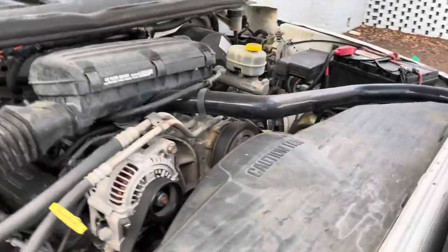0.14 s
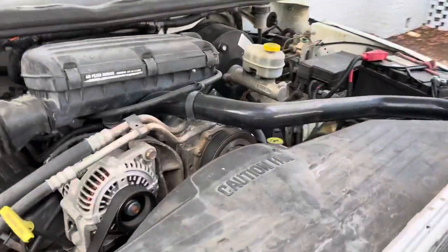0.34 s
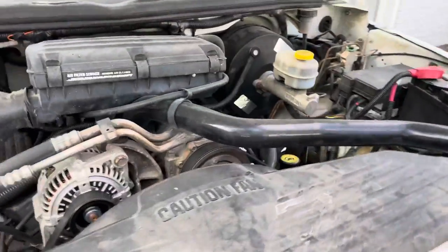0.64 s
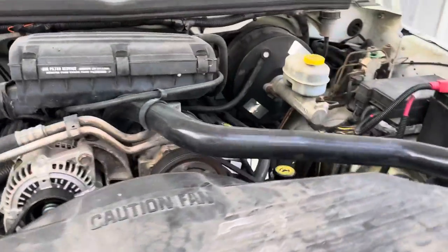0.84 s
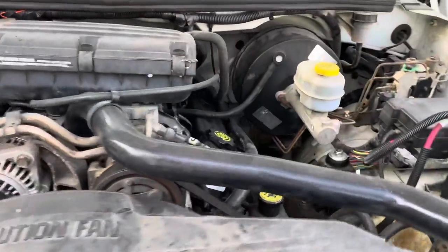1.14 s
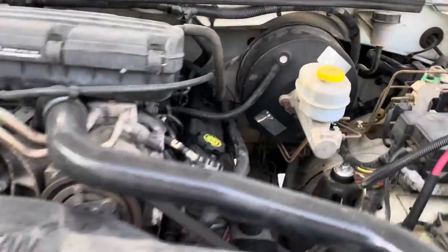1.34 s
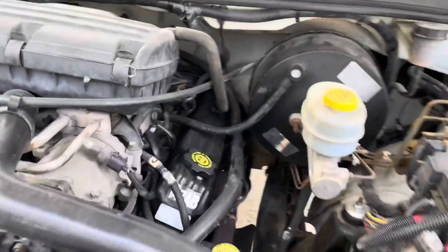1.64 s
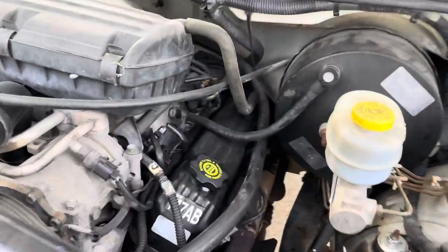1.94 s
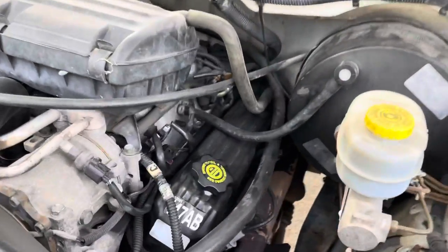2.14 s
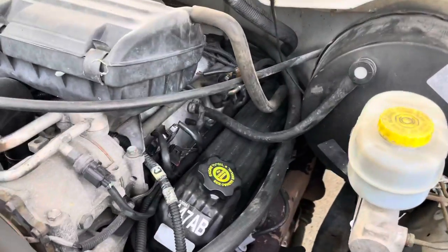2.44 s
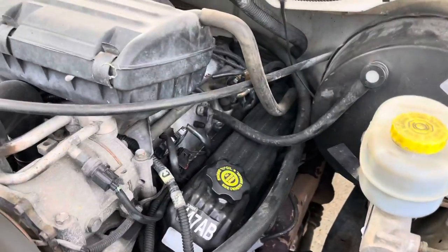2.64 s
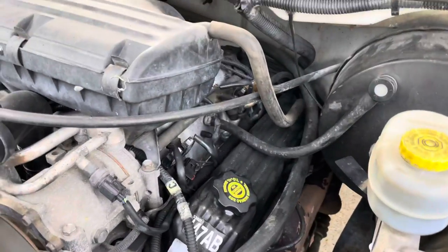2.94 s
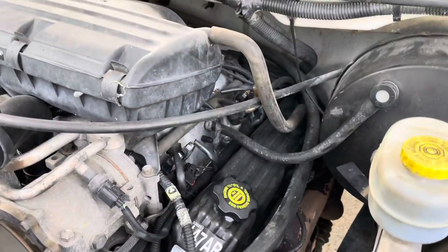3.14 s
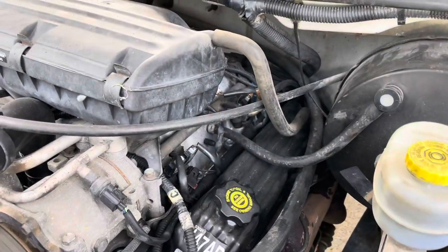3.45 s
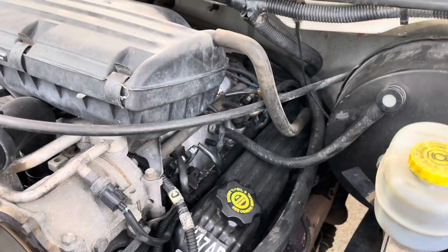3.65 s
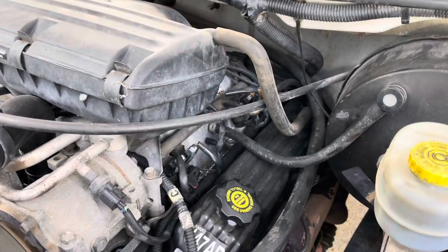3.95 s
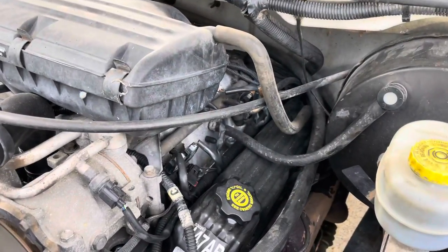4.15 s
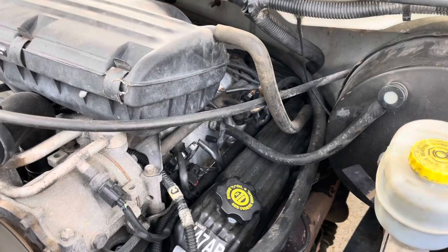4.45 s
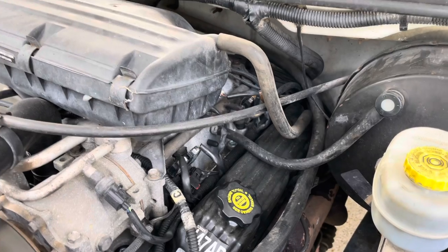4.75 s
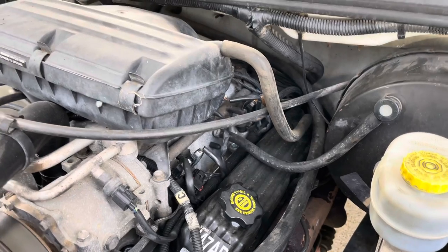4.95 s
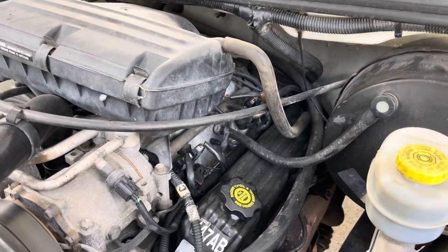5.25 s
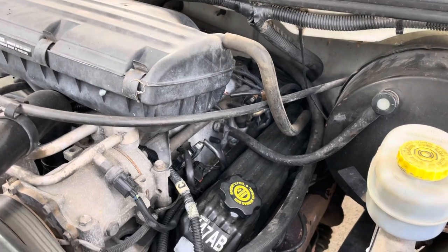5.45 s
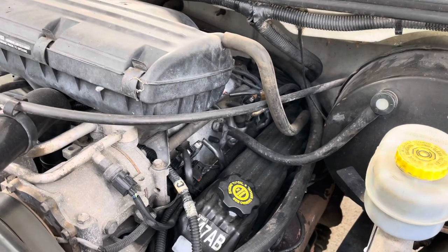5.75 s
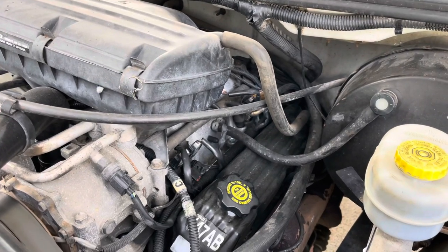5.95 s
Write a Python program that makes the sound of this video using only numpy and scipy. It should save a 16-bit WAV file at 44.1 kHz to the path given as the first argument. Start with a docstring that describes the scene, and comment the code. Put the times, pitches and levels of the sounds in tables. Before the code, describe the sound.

Outdoors, a stereo microphone moves in over the open bay of a large eight-cylinder petrol engine, already running. At 0 s it is at fast idle, a dense, quick throb with strong airy fan-shroud roar, belt rush and rattling metal, and two loose knocks near 0.1 s. Speed falls steadily, the throb dipping unevenly, and by about 2.2 s it settles into a slow, lumpy, limping idle. The roar fades by 2 s as the microphone leans closer; a slack lifter clacks most clearly from 2.1 to 3 s, and sharp spitting hiss comes forward. From 2.7 to 5.2 s a low fan hum swells, strongest near 3.7 s. A thin alternator whine wavers in and out, firmer after 4 s. Around 4.5 to 5 s the speed hunts slightly. Hollow intake honk, clatter, ticks and a faint panel drone grow until the cut at 6.1 s, still idling.

```python
"""A cross-plane V8 sinks from a fast idle to a lumpy 670 rpm, heard from above its open engine bay.
Uneven exhaust pulses throb through pipe resonances; intake gulps ring the air box into a honk.
Thumps at each cylinder's crank angle ring the block; ticks, rocker taps and a slack lifter join in.
Filtered noise makes hiss, shroud roar and belt rush, nearer as the microphone leans in.
Wavering sines make the fan hum, the alternator and pulley whines and a panel's drone."""
import sys
import numpy as np
from scipy import signal
from scipy.fft import rfft, irfft, next_fast_len
from scipy.io import wavfile
from scipy.ndimage import uniform_filter1d, map_coordinates

SR = 44100
rng = np.random.default_rng(int(sys.argv[2]) if len(sys.argv) > 2 else 0)


def generate_wav(sig):
    """Save sig (samples, or channels by samples) to the path in sys.argv[1] as 16-bit PCM at SR."""
    pcm = np.round(np.clip(np.atleast_2d(sig).T, -1, 1) * 32767).astype(np.int16)
    wavfile.write(sys.argv[1], SR, pcm)


N = 268569
TIME_S = np.arange(N) / SR

# Cylinders in firing order. Each row: exhaust lag in firing intervals, exhaust level in dB,
# intake lag in firing intervals, intake level in dB, hiss puff level in dB,
# thump lag in firing intervals, thump level in dB.
CYLINDERS = [ (0.284, 5, 0.732, -2, 13, 0.212, -6.5), (-0.187, 5.5, 0.5094, 4, 3, 0.2276, -7.5),
             (0.62, 0, 0.726, 5, 14, 0.07, -8), (0.26, 4.5, 0.596, 2, 14, 0.413, -3),
             (-0.188, 4.1, 0.627, 3.5, -2, 0.479, -8.5), (0.276, 3.1, 0.228, 2, 10, 0.1063, -4),
             (0.315, -1.5, 0.17, -2, -3, 0.2675, -8.5), (0.656, 4, 0.205, 2.5, 10, 0.3246, -5.5)]
CYLINDER_COUNT = len(CYLINDERS)

# Nearness of the parts as the microphone moves in. Each row: time in seconds, intake level in dB,
# block level in dB, belts level in dB, valve sizzle level in dB, hiss level in dB.
BAY_LEVELS = [(0, -38.5, -38.5, -38, -40.5, -54), (.55, -41.5, -42.5, -42.5, -45.5, -56),
              (1.2, -38.5, -41, -43, -47.5, -51.5), (1.55, -34.5, -39.5, -41, -44, -52.5),
              (2.35, -35, -36.5, -40, -42.5, -43), (4.2, -32, -35.5, -38.5, -42.5, -41.5),
              (5.4, -29, -35.5, -36.5, -41, -40), (6.09, -29, -32.5, -35.5, -40, -40)]

# Fan shroud roar, fading as the microphone moves over the engine. Each row: time in seconds, level in dB.
ROAR_LEVEL = [(0, -31.5), (.3, -36), (.6, -36.5), (1.0, -39.5), (1.4, -39), (2.0, -57), (6.09, -70)]


def undb(db):
    """Decibels to gain."""
    return 10 ** (np.asarray(db) / 20)


def unit(x):
    """Scale to rms 1."""
    return x / np.sqrt(np.mean(x ** 2))


def curves(table):
    """Columns of a breakpoint table, interpolated linearly over time."""
    time_s, *columns = np.transpose(table)
    return [np.interp(TIME_S, time_s, column) for column in columns]


def colour(x, points, share=1):
    """Zero-phase filter by (Hz, dB) points joined on a log-frequency axis; share scales the dB."""
    hz, db = np.transpose(points)
    size = next_fast_len(N + SR // 10)
    bins_hz = np.maximum(np.fft.rfftfreq(size, 1 / SR), 1)
    gain = undb(share * np.interp(np.log(bins_hz), np.log(hz), db))
    return irfft(rfft(x, size) * gain, size)[:N]


def noise(points):
    """Coloured noise of rms 1."""
    return unit(colour(rng.standard_normal(N), points))


def walk(rate_hz):
    """Smooth random control of rms 1: held random steps, averaged twice."""
    k = int(SR / rate_hz)
    steps = np.repeat(rng.standard_normal(N // k + 1), k)
    return unit(uniform_filter1d(uniform_filter1d(steps, k), k)[:N])


def ring(x, modes):
    """Sum of damped resonances, each given as (Hz, width in Hz, dB)."""
    return sum(undb(db) * signal.lfilter(*signal.iirpeak(hz, hz / width_hz, fs=SR), x)
               for hz, width_hz, db in modes)


def band(x, low_hz, high_hz, order):
    """Butterworth band-pass."""
    return signal.sosfilt(signal.butter(order, [low_hz, high_hz], "band", fs=SR, output="sos"), x)


def strokes(crank, lags, sizes_db, scatter_db, jitter):
    """One pulse per cylinder and cycle, scattered in size and time; crank, lags, jitter in firing intervals."""
    k = np.arange(int(crank[-1]))
    cylinder = k % CYLINDER_COUNT
    chance = rng.standard_normal((N // 100, 2))[:len(k)]
    lag = (lags + np.zeros(CYLINDER_COUNT))[cylinder]
    at = np.interp(k + lag + jitter * chance[:, 0], crank, np.arange(N))
    size = undb(sizes_db[cylinder] + scatter_db * chance[:, 1])
    # share each pulse between the two nearest samples
    whole, part = at.astype(int), at % 1
    early = np.bincount(whole, size * (1 - part), N + 1)
    late = np.bincount(whole + 1, size * part, N + 1)
    return (early + late)[:N]


def puffs(pulses, length_s):
    """Turn each pulse into a Gaussian envelope that falls to 1/e at length_s either side."""
    offset_s = np.arange(-(SR // 50), SR // 50 + 1) / SR
    return unit(signal.fftconvolve(pulses, np.exp(-(offset_s / length_s) ** 2), "same"))


def impacts(crank, count):
    """Small parts tap at the same crank angles cycle after cycle."""
    angle = rng.random(count) * CYLINDER_COUNT
    size = rng.choice([-1., 1.], count)
    when = (np.arange(0, crank[-1], CYLINDER_COUNT)[:, None] + angle).ravel()
    at = np.interp(when, crank, np.arange(N)).astype(int)
    return np.bincount(at, np.resize(size, len(at)) * (when < crank[-1]), N)


def exhaust(crank, lags, sizes_db):
    """The cylinders' pulses reach the pipe with different delays, so the beat limps."""
    # Each row: frequency in Hz, width in Hz, level in dB.
    pipe_modes = [(57.7, 11, 8), (68.2, 11.2, 14), (105.8, 19, 17.5)]
    pulses = strokes(crank, lags, sizes_db, scatter_db=1.76, jitter=0.017)
    return unit(band(ring(pulses, pipe_modes), 41.7, 115.5, order=4))


def lope_dips():
    """Exhaust gain: brief Gaussian dips in the limping throb, and one brief lift."""
    # Each row: centre in seconds, change in dB.
    dip_times = [(.45, -14), (.62, -7), (.76, -7), (.93, -14), (1.63, -17), (2.35, -1), (4.985, 4)]
    width_s = 0.026
    return undb(sum(db * np.exp(-((TIME_S - s) / width_s) ** 2) for s, db in dip_times))


def shake(crank, firing_hz):
    """The block rocks once per firing: a bass sine, louder with engine speed."""
    idle_hz, idle_db, rise_db_per_octave = 45, -39.5, 11
    db = idle_db + rise_db_per_octave * np.log2(firing_hz / idle_hz)
    return undb(db) * unit(np.cos(2 * np.pi * crank))


def intake(crank, lags, sizes_db):
    """Unequal gulps of air ring the air box, so the honk swells with the engine cycle."""
    # Each row: frequency in Hz, width in Hz, level in dB.
    airbox_modes = [(263.4, 17, 4), (309.5, 19.6, -3)]
    gulps = strokes(crank, lags, sizes_db, scatter_db=0.2, jitter=0.012)
    return unit(band(ring(gulps, airbox_modes), 214, 324, order=3))


def clatter(crank, lags, sizes_db):
    """Each cylinder thumps the block at its own crank angle and rings its modes; loose parts rattle along."""
    # Each row: frequency in Hz, width in Hz, level in dB.
    block_modes = [(326, 16, -2.5), (421.3, 21, 4.5), (453, 55, 1.5), (559, 13.2, 7.5), (640, 13, -11),
                   (689, 15, -2.5), (820, 21, -13), (980, 370, -9.5)]
    rattle_db = -2  # relative to the thumps
    blows = strokes(crank, lags, sizes_db, scatter_db=0.5, jitter=0.0073)
    grain = unit(impacts(crank, count=160)) + undb(-4.5) * rng.standard_normal(N)
    rattle = grain * (puffs(blows, length_s=0.0039) + 1.4)
    force = unit(blows) + undb(rattle_db) * unit(rattle)
    return unit(band(ring(force, block_modes), 300, 960, order=2))


def wash():
    """Rush of air around the block: coloured noise with an uneven level."""
    # Each row: frequency in Hz, level in dB.
    wash_spectrum = [(30, -24), (55, -25), (110, -15), (160, 0.5), (300, -1), (365, -1), (450, 0),
                     (525, -5), (565, -2.5), (610, -8), (700, -7), (770, -20), (1400, -22.5), (3000, -79)]
    return noise(wash_spectrum) * undb(0.76 * walk(16))


def lifter(crank):
    """One slack lifter clacks once per cycle: decaying noise bursts."""
    # Each row: frequency in Hz, level in dB.
    clack_spectrum = [(700, -11), (1400, 3.5), (1900, 7), (2600, -1), (4000, -12), (6500, -3), (12000, -30)]
    angle_firings, decay_s = 5.7, 0.015
    since_firings = (crank - angle_firings) % CYLINDER_COUNT
    since_s = since_firings / np.gradient(crank) / SR
    return unit(colour(rng.standard_normal(N) * np.exp(-since_s / decay_s), clack_spectrum))


def knocks():
    """Now and then the shaking engine knocks a loose part: decaying noise bursts."""
    # Each row: start in seconds, level in dB.
    knock_times = [(.1, -33), (.165, -31), (.884, -32), (.987, -35), (1.605, -35), (2.035, -35),
                   (2.995, -33), (4.225, -34), (4.628, -35), (5.471, -38), (5.717, -35)]
    # Each row: frequency in Hz, level in dB.
    knock_spectrum = [(400, -20), (750, 15), (1100, 4), (1700, -2), (2300, -13), (3400, -13), (6000, -22),
                      (8500, -55)]
    decay_s = 0.016
    force = sum(undb(db) * (TIME_S >= s) * np.exp(-np.abs(TIME_S - s) / decay_s) for s, db in knock_times)
    return force * noise(knock_spectrum)


def rockers(crank):
    """The rocker arms tap the valve cover, which rings briefly."""
    # Each row: frequency in Hz, width in Hz, level in dB.
    cover_modes = [(1726, 110, 1.5), (2070, 130, -2)]
    taps = sum(strokes(crank, lag, np.zeros(CYLINDER_COUNT), scatter_db=1.5, jitter=0.0296)
               for lag in (0.15, 0.45, 0.8))
    return unit(band(ring(taps, cover_modes), 1420, 2600, order=2))


def sizzle(crank):
    """Light tappet ticks gate noise over the steady rush of the accessories."""
    # Each row: frequency in Hz, level in dB.
    sizzle_spectrum = [(1200, -57), (2500, 4), (3300, 4.5), (4000, 1.5), (4500, 4), (5800, -0.5),
                       (7000, 1.5), (8500, -6), (10000, -1.5), (12000, -2.5), (13500, -4.5), (15700, -10.5)]
    pulses = strokes(crank, 0.67, np.zeros(CYLINDER_COUNT), scatter_db=1.5, jitter=0.11)
    ticks = puffs(pulses, length_s=0.0025)
    return unit(noise(sizzle_spectrum) + undb(-9.5) * ticks * noise(sizzle_spectrum))


def hiss(crank, sizes_db):
    """Gas spits from the near manifold in puffs at the firings, over a steady leak."""
    # Each row: frequency in Hz, level in dB.
    hiss_spectrum = [(4000, -15), (6000, -4.5), (7000, -2.5), (8000, 2.5), (9300, 6), (11000, 2.5),
                     (12300, 2), (12750, 7), (13150, 1), (14200, 0.5), (15700, -11.5)]
    gate = puffs(strokes(crank, 0.35, sizes_db, scatter_db=1.3, jitter=0.02), length_s=0.0067)
    return unit(noise(hiss_spectrum) + undb(-2) * gate * noise(hiss_spectrum))


def alternator(crank, firing_hz):
    """Belt-driven whine: a sine bent once per cycle by the crank's speed and at random, uneven in level."""
    whine_per_firing = 23.15
    flutter = 0.004 * np.sin(2 * np.pi * crank / CYLINDER_COUNT) + 0.005 * walk(70)
    phase = 2 * np.pi * np.cumsum(whine_per_firing * firing_hz * (1 + flutter)) / SR
    return unit(np.sin(phase) * undb(1.0 * walk(16) + 2.6 * walk(90)))


def fan():
    """Blade-passing hum of a fan slipping on its clutch; the overtone is heard close to the shroud."""
    # Each row: time in seconds, blade rate in Hz, level in dB.
    blade_track = [(0.0, 100.56, -37.5), (0.5, 102.94, -39.4), (1.2, 102.76, -40.6), (1.5, 106.77, -36.9),
                   (2.1, 103.64, -41.8), (2.5, 102.54, -36.5), (2.75, 103.57, -27.8), (3.1, 104.58, -28.7),
                   (3.35, 105.84, -28.8), (3.7, 103.97, -21.2), (4.2, 103.15, -24.8), (4.7, 101.27, -22.5),
                   (5.1, 100.31, -28.3), (5.6, 100.14, -34.1), (6.09, 99.27, -32.5)]
    overtone_db = -13.5  # second harmonic, relative to the shroud's roar
    blade_hz, hum_db = curves(blade_track)
    phase = 2 * np.pi * np.cumsum(blade_hz) / SR
    hum = undb(hum_db) * unit(np.sin(phase))
    overtone = undb(curves(ROAR_LEVEL)[0] + overtone_db) * unit(np.sin(2 * phase))
    return hum + overtone


def belts(crank):
    """Belts chatter: a grain repeating every cycle inside an uneven rush."""
    # Each row: frequency in Hz, level in dB.
    belt_spectrum = [(300, -14.5), (650, 0), (1050, 3.5), (1300, -3.5), (1580, -2.5), (1760, -1),
                     (1920, -3.5), (2150, -3), (2700, -11.5), (4000, -27), (8000, -63)]
    grain = unit(colour(impacts(crank, count=320), belt_spectrum))
    return unit((noise(belt_spectrum) + grain) * undb(1.0 * walk(70)))


def pulley(firing_hz):
    """An idler pulley sings faintly just below the alternator, wavering as the belt flaps."""
    whine_per_firing, level_db = 20.9, -15  # level relative to the belts
    phase = 2 * np.pi * np.cumsum(whine_per_firing * firing_hz * (1 + 0.00415 * walk(30))) / SR
    return undb(level_db) * unit(np.sin(phase) * undb(2 * walk(29.97)))


def drone():
    """A panel, shaken by the block, holds a nearly steady note of uneven level."""
    panel_hz = 561
    phase = 2 * np.pi * np.cumsum(panel_hz * (1 + 0.011 * walk(35))) / SR
    return unit(np.sin(phase) * undb(4.2 * walk(30)))


def roar(crank):
    """The shroud roars; its reflection off the fan cover comes ever later, so the colour sweeps down."""
    # Each row: frequency in Hz, width in Hz, level in dB.
    shroud_modes = [(339.4, 28, 9), (613, 113, -0.5), (748, 43, -8), (960, 190, -8.5), (1340, 220, -15),
                    (3260, 600, -15)]
    extra_path_m, path_growth_m_per_s, reflection_db = 0.51, 0.67, -16.5
    force = unit(impacts(crank, count=90)) + undb(-4) * rng.standard_normal(N)
    direct = band(ring(force, shroud_modes), 175, 3200, order=2)
    delay_s = (extra_path_m + path_growth_m_per_s * TIME_S) / 343  # speed of sound in m/s
    reflection = map_coordinates(direct, [(TIME_S - delay_s) * SR], order=1)
    return unit((direct + undb(reflection_db) * reflection) * undb(2.8 * walk(45.1)))


def machinery(crank, firing_hz):
    """Sum of everything that rushes, ticks and whines under the bonnet."""
    # Lifter, loudest as the microphone passes the valve cover. Each row: time in seconds, level in dB.
    lifter_level = [(0, -62), (1.7, -58), (2.15, -49), (2.5, -49), (2.75, -47), (3.2, -55), (6.09, -58)]
    # Panel drone, growing as the microphone moves in. Each row: time in seconds, level in dB.
    panel_level = [(0, -62), (1.2, -55), (1.9, -46), (4.5, -44), (6.09, -41.5)]
    # Alternator whine, swelling and fading again and again. Each row: time in seconds, level in dB.
    whine_level = [(0, -61), (.56, -55), (.64, -40), (.74, -47), (.84, -52), (1.05, -45), (1.14, -56),
                   (1.36, -40), (1.58, -52), (1.75, -48.5), (1.96, -41.5), (2.2, -49.5), (2.83, -43),
                   (3.02, -50), (3.3, -41.5), (3.85, -49), (4.03, -39), (4.2, -48), (4.36, -38.5),
                   (4.51, -44), (4.66, -37), (4.8, -42.5), (5.22, -42), (5.38, -42), (5.55, -40),
                   (6.09, -40.5)]
    wash_db, rocker_db = 0.5, -9  # relative to the clatter and to the belts
    *_, puff_db, thump_lag, thump_db = np.transpose(CYLINDERS)
    _, block_db, belts_db, sizzle_db, hiss_db = curves(BAY_LEVELS)
    parts = undb(block_db) * (clatter(crank, thump_lag, thump_db) + undb(wash_db) * wash())
    parts += undb(curves(ROAR_LEVEL)[0]) * roar(crank)
    parts += undb(curves(lifter_level)[0]) * lifter(crank)
    parts += knocks()
    parts += undb(belts_db) * (belts(crank) + pulley(firing_hz) + undb(rocker_db) * rockers(crank))
    parts += undb(curves(panel_level)[0]) * drone()
    parts += undb(sizzle_db) * sizzle(crank)
    parts += undb(hiss_db) * hiss(crank, puff_db)
    parts += undb(curves(whine_level)[0]) * alternator(crank, firing_hz)
    return parts


def scene():
    """One crankshaft paces the engine, the fan keeps its own pace; mid and side make left and right."""
    # Engine speed. Each row: time in seconds, firing rate in Hz.
    speed_track = [(0.0, 87.01), (0.2, 82.65), (0.45, 73.47), (0.64, 70.03), (0.8, 64.87), (1.0, 60.01),
                   (1.4, 53.98), (1.8, 49.79), (2.25, 46.24), (2.75, 46.67), (3.0, 46.58), (3.45, 44.63),
                   (4.4, 44.81), (4.52, 44.19), (4.66, 45.97), (4.8, 43.97), (4.95, 46.02), (5.3, 44.98),
                   (5.7, 44.64), (6.09, 44.83)]
    # Exhaust throb: quick lumps at first, slower swells later. Each row: time in seconds, level in dB.
    exhaust_level = [(0.0, -23), (0.18, -32), (0.3, -24.1), (0.42, -32.5), (0.51, -30.5), (0.68, -30.5),
                     (0.9, -32), (1.4, -24.5), (1.7, -27), (2.1, -24), (2.45, -25.5), (2.85, -22.5),
                     (3.35, -24.5), (4.0, -26), (4.85, -26), (5.6, -23), (6.09, -25)]
    # Machinery colour for mid and side: the middle dips near 9 kHz while the sides stay full.
    # Each row: frequency in Hz, mid level in dB, side level in dB.
    mid_side_spectra = [(60, 2.5, -5), (300, 0, -5), (438, -1, -11), (670, -1, -1.5), (1290, 0, -3),
                        (2400, -0.5, -3.5), (4400, -0.5, -3.5), (6940, 0.5, -0.5), (7610, -4.5, 3),
                        (9180, -43, 3.5), (9240, -6.5, 1), (10700, 1, 3), (12000, 2, -1), (12800, 2.5, -19),
                        (16000, 5, -45)]
    # Each row: frequency in Hz, left minus right in dB.
    balance = [(60, -2.5), (130, -5), (260, -1.5), (500, -5), (1000, 2.5), (2000, 1), (4000, 2.5),
               (8000, -0.5)]
    firing_hz, = curves(speed_track)
    crank = np.cumsum(firing_hz) / SR  # in firing intervals
    exhaust_lag, exhaust_db, intake_lag, gulp_db, *_ = np.transpose(CYLINDERS)
    colour_hz, mid_db, side_db = np.transpose(mid_side_spectra)

    mid = undb(curves(exhaust_level)[0]) * lope_dips() * exhaust(crank, exhaust_lag, exhaust_db)
    mid += shake(crank, firing_hz) + fan()
    mid += undb(curves(BAY_LEVELS)[0]) * intake(crank, intake_lag, gulp_db)
    mid += colour(machinery(crank, firing_hz), list(zip(colour_hz, mid_db)))
    # a second, independent draw spreads the machinery across the bay
    side = colour(machinery(crank, firing_hz), list(zip(colour_hz, side_db)))

    left = colour(mid + side, balance, share=1 / 2)
    right = colour(mid - side, balance, share=-1 / 2)
    return np.array([left, right])


def record(dry):
    """The recorder cuts the top: a steep elliptic low-pass."""
    top_hz = 15600
    return signal.sosfilt(signal.ellip(10, .2, 80, top_hz, fs=SR, output="sos"), dry)


dry = scene()
out = record(dry)
generate_wav(out)
```